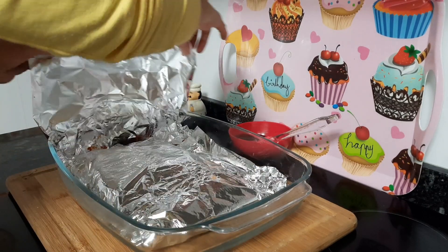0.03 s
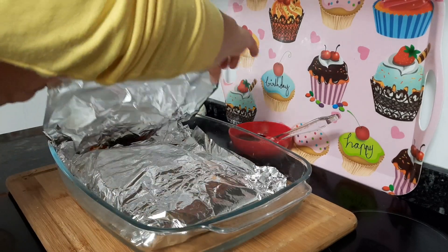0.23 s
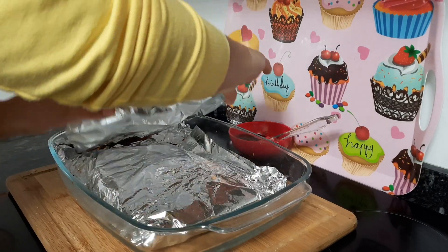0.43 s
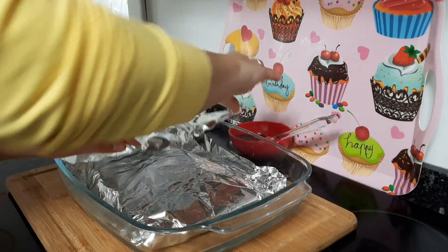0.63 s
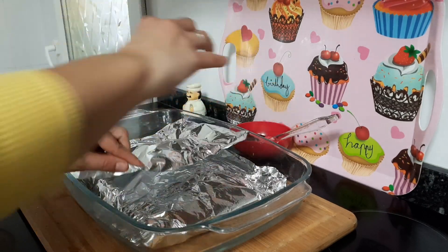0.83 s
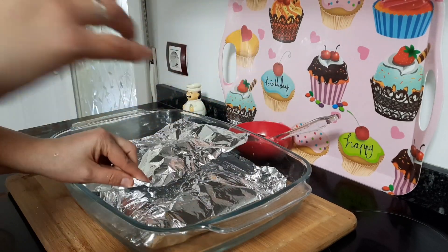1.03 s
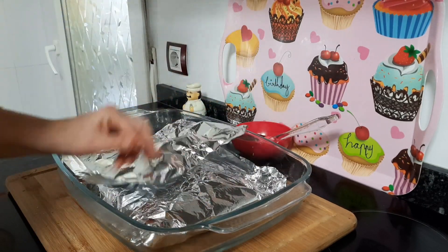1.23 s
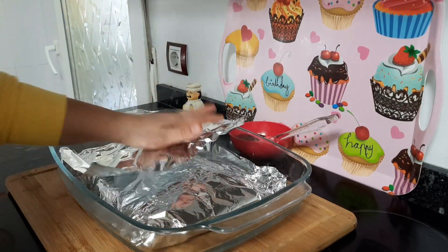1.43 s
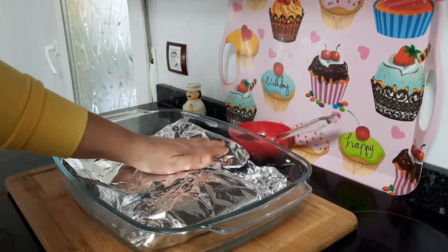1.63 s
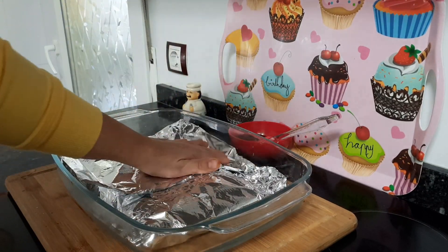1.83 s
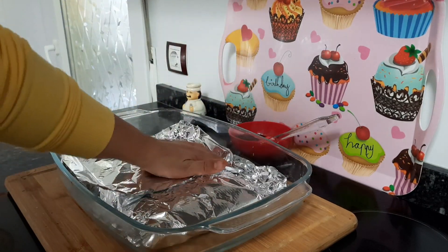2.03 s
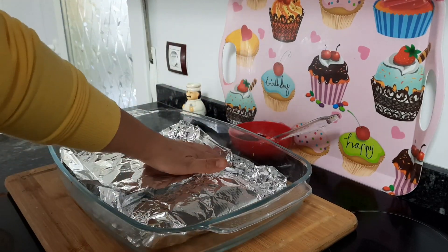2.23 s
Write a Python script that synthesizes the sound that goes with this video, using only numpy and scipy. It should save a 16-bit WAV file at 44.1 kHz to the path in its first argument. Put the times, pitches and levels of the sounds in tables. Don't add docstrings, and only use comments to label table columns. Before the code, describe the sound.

Close stereo pickup of crisp foil being folded and pressed down in a glass dish on a wooden board, crackling densely, almost stopping, then crackling again before easing off, over a quiet appliance rumble.

```python
import sys
import numpy as np
from scipy import signal
from scipy.fft import rfft, irfft, next_fast_len
from scipy.io import wavfile
from scipy.ndimage import uniform_filter1d

SR = 44100
rng = np.random.default_rng(int(sys.argv[2]) if len(sys.argv) > 2 else 0)


def volts_from_db(level):
    exponent = np.asarray(level, float) / 20
    return 10 ** exponent


def digitize_waveform(pressure):
    field = np.atleast_2d(pressure).T
    bounded = np.clip(field, -1, 1)
    quanta = np.round(bounded * 32767).astype(np.int16)
    wavfile.write(sys.argv[1], SR, quanta)


N = 100239
PAD = next_fast_len(N + 30000)
HZ = np.arange(PAD // 2 + 1) * SR / PAD + 1e-3

# pitch_hz, level_db (per Hz)
HUM_COLOUR = [(18, -32), (55, -8), (139, 0.5), (205, -18), (320, -22), (1050, -45), (1860, -15),
              (16000, -51)]
# start_s, level_db, length_s
BOARD_SHIFTS = [
    (0.014, -62.5, 0.034),
    (0.123, -64, 0.028),
    (0.246, -56.5, .05),
    (0.314, -66, .03),
    (0.48, -58, 0.042),
    (0.537, -64, 0.075),
    (0.867, -62, 0.085),
    (1.18, -63.5, 0.056),
    (1.56, -67.5, 0.053),
    (2.056, -69, 0.055),
]
# pitch_hz, level_db (per Hz)
SHIFT_COLOUR = [(20, -13), (50, -5.5), (110, -7), (190, 2), (260, -7), (480, 8.5), (700, -52)]
# start_s, peak_db, board_share_db
KNOCKS_BY_HAND = [(0.009, -46, -9), (0.078, -45, -20), (0.109, -43.5, -12), (0.172, -42, 1),
                  (0.195, -46.5, -20), (0.226, -42.5, -10), (0.491, -40.5, -9), (0.515, -50, 6),
                  (0.778, -46.5, -10), (0.835, -44, -7), (0.913, -44.5, -30), (0.95, -44.5, -25),
                  (1.123, -64.5, 9), (1.189, -50, -14), (1.39, -68, -15), (1.554, -49, -8), (2.051, -66, 3),
                  (2.147, -64, -15)]
# pitch_hz, level_db, fade_by_60db_s
BOARD_TONES = [(95.3, 6.5, 0.087), (58, -2, 0.13), (166, -1.5, 0.052)]
# pitch_hz, level_db, fade_by_60db_s
DISH_TONES = [(307, -4.5, 0.19), (349, -6, 0.17), (416.5, -9, 0.39), (605, -11, 0.18), (805, -5.5, 0.039)]
# start_s, level_db, pitch_hz, fade_by_60db_s
RIM_RINGS = [(.947, -38, 1950, 0.073), (.955, -41.5, 1850, .35), (1.011, -44.5, 1890, 0.076),
             (1.058, -36, 1250, 0.063), (1.063, -36, 1990, 0.049), (1.118, -43, 1790, .1),
             (1.144, -39, 1770, .06), (1.41, -58, 2980, 0.046), (1.409, -59, 1870, 0.07),
             (2.136, -38, 747, 0.073), (2.134, -32, 2490, 0.035)]
# start_s, peak_db
LONE_SNAPS = [(.2895, -16), (.3677, -12), (.4635, -20), (.898, -16), (1.016, -18), (1.4735, -25),
              (1.504, -22), (1.8385, -17), (1.867, -17), (2.1, -13), (2.138, -17)]
# time_s, crackle_db, brightness_db_per_octave
HAND_PRESSURE = [
    [(0, -40, 1), (.16, -45, 0), (.2, -40.5, -0.5), (.38, -43.5, -1.5), (.45, -43.5, 0), (.6, -46.5, -1),
     (.742, -57, -2)],
    [(.743, -48, -2), (.76, -51, 1), (.83, -40.5, -2), (.95, -43, -1), (1.04, -44.5, -0.5),
     (1.2, -43, -0.5), (1.3, -63, -3), (1.38, -70.5, -4), (1.471, -79, -2)],
    [(1.472, -57, 2), (1.54, -46, -1), (1.64, -39, -1), (1.68, -44, -.5), (1.75, -41, 0.5),
     (2.01, -40.5, 0.5), (2.16, -44.5, 0), (2.27, -63.5, -4)],
]
# start_s, peak_db, low_body_db, fade_s
FIRST_FOLDS = [(0.0523, -47, -31, 0.013), (0.0744, -48, -21, 0.013), (0.1034, -22, -26, 0.036),
               (0.135, -18, -23, 0.017), (0.174, -20.5, -33, 0.022), (0.208, -22, -23.5, 0.063),
               (0.2394, -22.5, -24, 0.13), (0.2844, -14, -22, 0.035), (0.3182, -17, -24, 0.014),
               (0.3647, -29, -18.5, 0.0083), (0.3854, -25, -15.5, 0.014), (0.4429, -26.5, -21, 0.051),
               (0.4654, -20.5, -18.5, 0.062), (0.488, -17.5, -23, 0.051), (0.541, -21, -20.5, 0.054),
               (0.6094, -26, -25, 0.034), (0.6694, -23.5, -21.5, 0.0059), (0.7008, -32, -35, 0.01),
               (0.7445, -24, -28, 0.008), (0.7653, -19, -22, 0.013), (0.7786, -17.5, -19.5, 0.019),
               (0.836, -12.5, -21, 0.038), (0.8667, -21, -14, 0.013), (0.898, -22, -18, 0.086),
               (0.9444, -23.5, -12, 0.0098), (1.0125, -24, -20.5, 0.032), (1.058, -17, -22.5, 0.012),
               (1.118, -21.5, -24.5, 0.053), (1.1456, -25.5, -18, 0.046), (1.2, -22, -20.5, 0.052)]
# start_s, peak_db, low_body_db, fade_s
SECOND_FOLDS = [(1.474, -30.5, -27.5, 0.023), (1.501, -24, -22.5, 0.037), (1.5424, -19.5, -24.5, 0.089),
                (1.5694, -20, -21.5, 0.04), (1.597, -17.5, -24, 0.032), (1.6294, -22, -19, 0.019),
                (1.7007, -11.5, -26.5, 0.0064), (1.7815, -16, -22, 0.02), (1.8044, -30, -30, 0.018),
                (1.8372, -23, -19, 0.053), (1.8854, -21, -24, 0.013), (1.9124, -33, -26, 0.0088),
                (1.9664, -23, -21.5, 0.086), (2.015, -20.5, -22, 0.019), (2.0494, -20.5, -23, 0.013),
                (2.0984, -15.5, -26, 0.0099), (2.1104, -25, -18, 0.041), (2.137, -17, -17.5, 0.011),
                (2.1474, -25, -25, 0.016), (2.1764, -43, -23, 0.013)]
# start_s, peak_db, pitch_hz, fade_s
BRIGHT_CRACKS = [(0.174, -10, 11000, 0.0044), (.2105, -22, 5000, .004), (0.28, -13, 13000, .01),
                 (.2875, -12, 7500, 0.0036), (.3195, -18, 12000, 0.005), (0.3664, -8, 6000, .002),
                 (0.462, -10, 900, 0.0067), (.496, -6.5, 800, 0.012), (.49, -15, 12000, 0.019),
                 (0.234, -11.5, 1010, 0.013), (.784, -15, 2500, 0.0055), (.841, -19, 9050, 0.0052),
                 (.8695, -13, 8100, 0.0043), (.897, -17, 9000, .002), (1.0106, -18, 8900, 0.0045),
                 (1.06, -15, 1300, 0.0092), (1.2007, -16, 5000, .005), (1.504, -21, 11000, 0.0045),
                 (1.531, -25, 9000, .006), (1.5427, -14, 2800, 0.0047), (1.562, -16.5, 6000, .008),
                 (1.5985, -11, 11000, .004), (1.644, -20, 9000, 0.0065), (1.693, -28, 11000, 0.0044),
                 (1.804, -14, 6040, 0.0045), (1.892, -18, 6000, .005), (2.0183, -13.5, 5970, .006),
                 (2.0983, -10, 5970, .003), (2.124, -26, 3500, 0.0027), (2.1355, -10.5, 2900, 0.0044),
                 (2.178, -16.5, 3020, 0.0038)]
# start_s, peak_db, pitch_hz, fade_s
RELAXING_CREASES = [
    (1.283, -35, 13000, 0.0073),
    (1.3224, -30, 8500, 0.0062),
    (1.345, -24, 7960, 0.0043),
    (1.4093, -33.5, 2750, .005),
    (1.4105, -45.5, 11000, 0.013),
]
# pitch_hz, level_db (per Hz)
FOIL_COLOUR = [(150, -32), (250, -15), (298, -9.5), (802, -4), (1080, -4.5), (1850, 0.5), (9660, 1),
               (12800, 4), (16000, -3)]
# pitch_hz, left_minus_right_db
PORT_COLOUR = [(60, 9), (110, -5.5), (200, 9), (380, 1.5), (700, 4), (1290, 1), (2380, 3.5), (4400, -0.5),
               (8120, 0), (15000, 8.5)]

HUM_DB, RUMBLE_DB = -68, 1.2
MAINS_HZ, MAINS_DB = 97.7, -71.5
ALIKE_HZ = 560
WOBBLE = .006
SNAP_DB, SNAP_S = -1, .0004
SHIMMER_T60_S, SHIMMER_DB, LOW_LONGER = 0.039, 2, 0.64
CREASES, CREASE_DB, SPREAD_S = 9000, 5.5, .00012
SCATTER_DB, BIGGEST, CLUMP_DB = 1.5, 3.4, 1.0
COLOUR_OCT, COLOUR_DB, PATCH_DB = 1.75, 4, 0.86
BODY_DB, FOLD_DB, FOLD_RISE_S = -19.5, -10.5, 0.00053
CRACK_DB, FOLD_OCT, FOLD_WIDE_DB = 1, 1.25, -21
HOLLOW_HZ, HOLLOW_OCT, HOLLOW_DB, LIGHT_DB = 1150, .7, -13, -51
RATTLE_DB, RATTLE_WIDTH_HZ = 2, 16
ROOM_T60_S, ROOM_DB, ROOM_DELAY_S = 0.24, -7.5, 0.003
ROOM_DULL_HZ, ROOM_DIP_DB = 6400, -7
CEILING = .22


def unit(x):
    return x / np.sqrt(np.mean(x ** 2))


def colour(table, hz):
    pitch_hz, level_db = np.array(table).T
    return volts_from_db(np.interp(np.log(hz), np.log(pitch_hz), level_db))


def hue(hz, centre, octaves):
    return np.exp(-(np.log2(hz / centre) / octaves) ** 2)


def kitchen():
    mid, side = rfft(rng.standard_normal((2, PAD))) * colour(HUM_COLOUR, HZ)
    side = side * np.clip(HZ / ALIKE_HZ, .3, 1)
    slow = uniform_filter1d(rng.standard_normal(N), size=3000)
    waver = unit(uniform_filter1d(slow, size=3000))
    rumble = unit(irfft(np.array([mid + side, mid - side]), PAD)[:, :N])
    mains = np.sin(2 * np.pi * MAINS_HZ * np.arange(N) / SR)
    return rumble * volts_from_db(HUM_DB + RUMBLE_DB * waver) + volts_from_db(MAINS_DB + waver) * mains


def walls():
    t = np.arange(30000) / SR - ROOM_DELAY_S
    fade = np.exp(-np.log(1000) * np.abs(t) / ROOM_T60_S) * np.clip(t * SR, 0, 1)
    echoes = rfft(rng.standard_normal((2, len(t))) * fade, PAD)
    echoes = echoes / np.sqrt(uniform_filter1d(np.abs(echoes) ** 2, size=400))
    dull = 1 / np.sqrt(1 + (HZ / ROOM_DULL_HZ) ** 2)
    return volts_from_db(ROOM_DB) * echoes * dull * volts_from_db(ROOM_DIP_DB * hue(HZ, HOLLOW_HZ, HOLLOW_OCT))


def handling():
    t = np.arange(N) / SR
    effort = sum(volts_from_db(db) * np.exp(-((t - start) / length) ** 2) for start, db, length in BOARD_SHIFTS)
    rumble = irfft(rfft(rng.standard_normal(PAD)) * colour(SHIFT_COLOUR, HZ), PAD)[:N]
    return rfft(unit(rumble) * effort, PAD)


def ring(start, hz, t60, phase):
    t = np.clip(np.arange(N) / SR - start, 0, None)
    rise = -np.expm1(-t * hz)
    return np.sin(2 * np.pi * hz * t + phase) * np.exp(-np.log(1000) * t / t60) * rise


def knocks():
    phases = 2 * np.pi * rng.random((60, 8))
    drift = unit(uniform_filter1d(rng.standard_normal(N), size=300))
    unsteady = 2 * np.pi * WOBBLE * np.cumsum(drift) / SR
    out = sum(volts_from_db(db) * ring(start, hz, t60, unsteady * hz) for start, db, hz, t60 in RIM_RINGS)
    for (start, db, board_db), phase in zip(KNOCKS_BY_HAND, phases):
        for (hz, tone_db, t60), turn in zip(BOARD_TONES, phase):
            out = out + volts_from_db(db + board_db + tone_db) * ring(start, hz, t60, turn)
        for (hz, tone_db, t60), turn in zip(DISH_TONES, phase[3:]):
            out = out + volts_from_db(db + tone_db) * ring(start, hz, t60, turn)
    return rfft(out * volts_from_db(np.array([[.2], [-.2]])), PAD)


def lone_snaps():
    t = np.arange(100) / SR
    snaps = np.zeros((2, PAD))
    bursts = rng.standard_normal((len(LONE_SNAPS), 2, len(t)))
    for (start, db), burst in zip(LONE_SNAPS, bursts):
        first = int(start * SR)
        snaps[:, first:first + len(t)] = volts_from_db(db + SNAP_DB) * np.sign(burst) * np.exp(-t / SNAP_S) / 2
    return rfft(snaps) * (HZ / 4000) / (1 + (HZ / 6000) ** 2)


def shimmer(snaps, hz):
    t60 = SHIMMER_T60_S * (6000 / hz) ** LOW_LONGER
    keep = np.exp(-2 * np.log(1000) / (t60 * SR))
    noise = rng.standard_normal((2, N))
    alike = 1 / (1 + (hz / ALIKE_HZ) ** 2)
    noise[1] = alike * noise[0] + np.sqrt(1 - alike ** 2) * noise[1]
    return noise * np.sqrt(signal.lfilter([1 - keep], [1, -keep], snaps ** 2))


def foil():
    press_s, *press_rows = np.concatenate(HAND_PRESSURE).T
    events = np.array(FIRST_FOLDS + SECOND_FOLDS + BRIGHT_CRACKS + RELAXING_CREASES).T
    start, peak_db, body_or_hz, fade = events
    plain = len(FIRST_FOLDS + SECOND_FOLDS)
    when, rarity, sign, place, tint = rng.random((CREASES, 5)).T
    t = when * N / SR
    clump_db = CLUMP_DB * rng.standard_normal(500)[(t * 200).astype(int)]
    size_db = SCATTER_DB * np.minimum(-np.log(rarity), BIGGEST) + clump_db
    size = volts_from_db(size_db) * np.sign(sign - .5)
    size /= np.sqrt(np.mean(size ** 2) * len(t) / N)
    age = np.clip(t[:, None] - start, 0, None)
    swell = -np.expm1(-age / FOLD_RISE_S) * np.exp(-age / np.clip(fade, .002, 1))
    bed_db, tilt = (np.interp(t, press_s, row) for row in press_rows)
    lag = SPREAD_S * (2 * place - 1)
    crease_hz = 400 * 40 ** tint
    out = 0
    for hz in 250 * 2 ** np.arange(0, 6.1, .5):
        body = (body_or_hz[:plain] - BODY_DB) * np.clip(np.log2(6000 / hz) / 1.6, -.2, 1.2)
        bright = CRACK_DB + FOLD_WIDE_DB * (1 - hue(hz, body_or_hz[plain:], FOLD_OCT))
        event_db = peak_db + FOLD_DB + np.r_[body, bright]
        light = np.clip((LIGHT_DB - bed_db) / 8, 0, 1)
        hollow = HOLLOW_DB * hue(hz, HOLLOW_HZ, HOLLOW_OCT) * light
        rustle_db = bed_db + CREASE_DB + tilt * np.log2(hz / 6000) + hollow
        power = volts_from_db(2 * rustle_db) + swell ** 2 @ volts_from_db(2 * event_db)
        gain = size * np.sqrt(power) * volts_from_db(COLOUR_DB * (2 * hue(hz, crease_hz, COLOUR_OCT) - 1))
        gain *= volts_from_db(PATCH_DB * np.interp(t * 60, np.arange(140), rng.standard_normal(140)))
        ears = []
        for side in (1, -1):
            sample = np.clip((t + side * lag) * SR, 0, N - 1).astype(int)
            ears.append(np.bincount(sample, gain, N))
        ears = ears + volts_from_db(SHIMMER_DB) * shimmer(np.array(ears), hz)
        band = np.clip(1 - np.abs(2 * np.log2(HZ / hz)), 0, 1)
        out = out + rfft(ears, PAD) * band
    dish = sum(volts_from_db(db + RATTLE_DB) / (1 + 2j * (HZ - hz) / RATTLE_WIDTH_HZ) for hz, db, _ in DISH_TONES)
    return out * colour(FOIL_COLOUR, HZ) * (1 + dish) / np.sqrt(1 + volts_from_db(2 * SHIMMER_DB))


def scene():
    near = foil() + lone_snaps() + knocks() + handling()
    return irfft(near * (1 + walls()), PAD)[:, :N] + kitchen()


def top_cut(x):
    return signal.sosfilt(signal.butter(12, 16500, fs=SR, output="sos"), x)


def record(dry):
    rounded = CEILING * np.tanh(dry / CEILING)
    ports = colour(PORT_COLOUR, np.clip(HZ, 30, None)) ** np.array([[.5], [-.5]])
    ports = ports * np.clip((16200 - HZ) / 500, 0, 1) / (1 + (45 / HZ) ** 4)
    mix = irfft(rfft(rounded, PAD) * ports, PAD)[:, :N]
    return top_cut(mix)


dry = scene()
out = record(dry)
digitize_waveform(out)
```